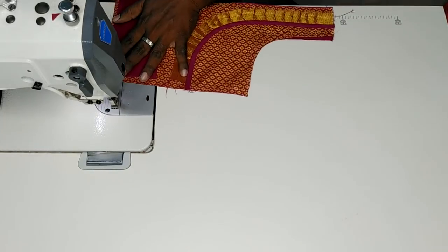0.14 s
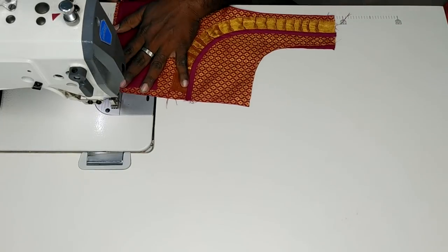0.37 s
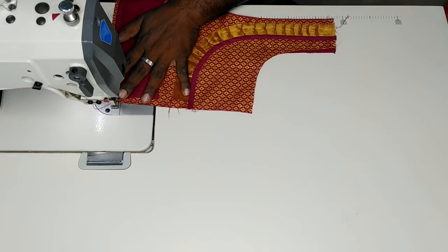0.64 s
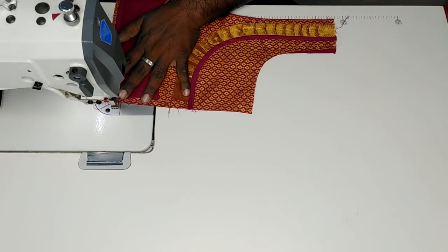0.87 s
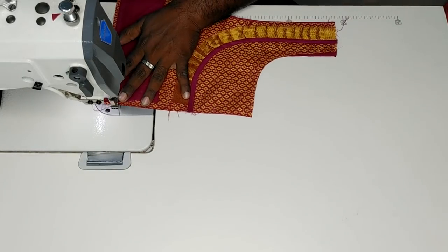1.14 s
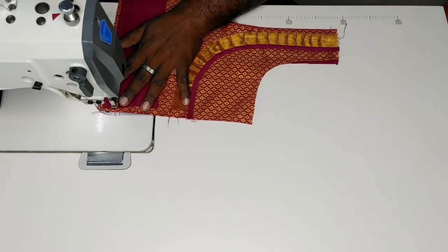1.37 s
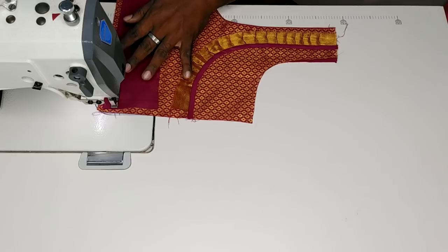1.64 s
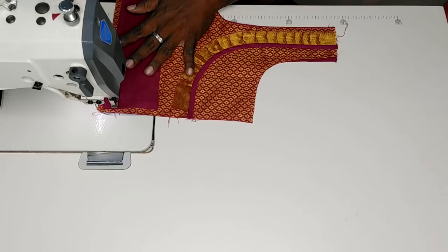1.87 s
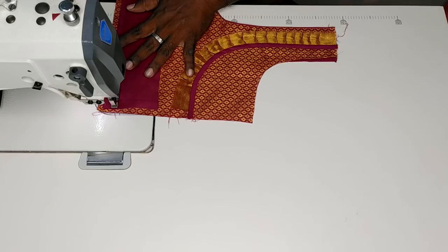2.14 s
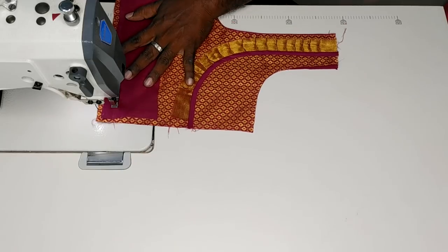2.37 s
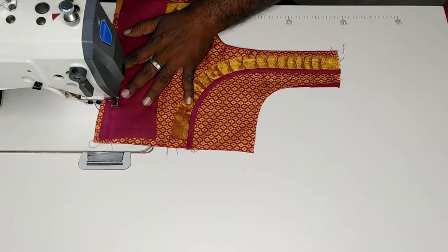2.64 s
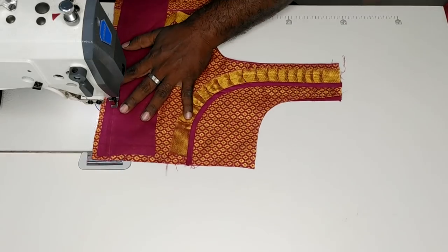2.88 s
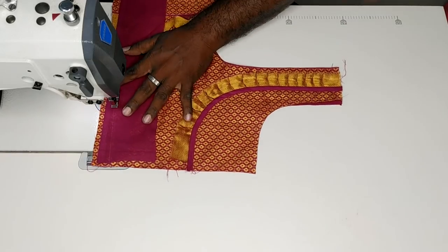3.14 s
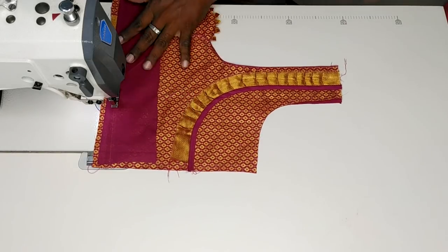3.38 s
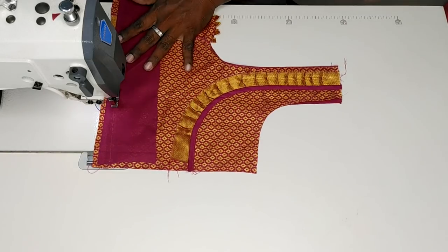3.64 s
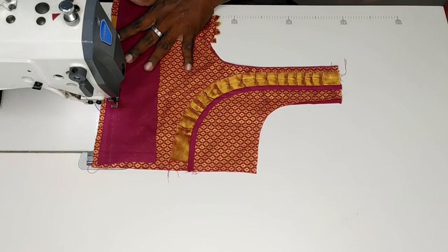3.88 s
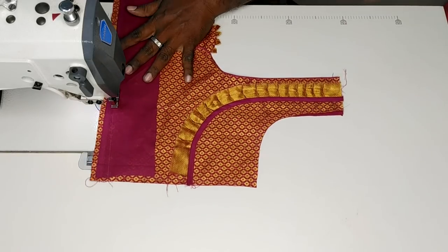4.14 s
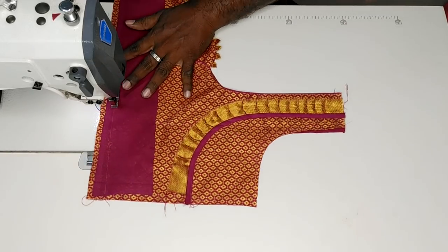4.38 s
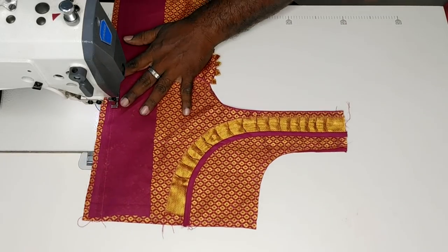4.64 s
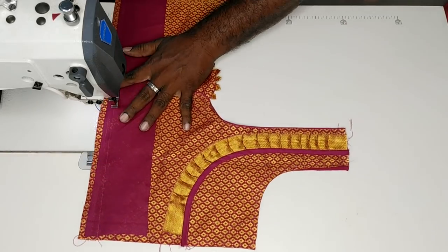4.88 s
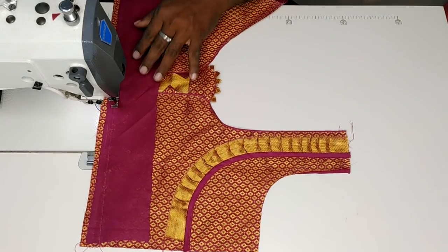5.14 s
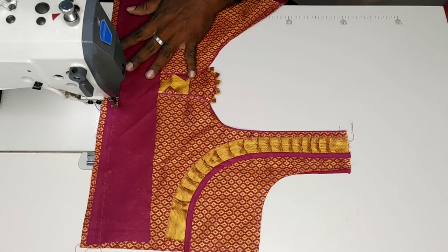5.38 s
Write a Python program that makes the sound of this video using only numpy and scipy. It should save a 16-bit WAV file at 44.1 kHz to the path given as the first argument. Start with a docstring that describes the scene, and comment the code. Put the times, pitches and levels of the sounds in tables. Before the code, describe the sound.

A quiet workshop with a low, distant murmur of machines and fans, heard close above a sewing table in stereo. During the first second there is faint cloth rustling, a soft knock near 0.15 s, and lever clicks around 0.7 to 1.1 s. At 1.1 s the machine starts a short, slower run with distinct ticks, brakes at 1.4 s with a knock and stops by 1.65 s. Soft fabric rubbing follows. At 2.3 s it leaps to full speed: a dense low buzz near 56 stitches a second, whining gears and bright, pulsing metal clatter, slightly faster at first, then steady. A sharp clack at 3.0 s begins a falling rundown, ending at 3.3 s. Cloth slides and scrapes around 3.4 to 3.6 s. A longer fast run begins at 4.0 s, brakes with another clack at 5.0 s and stops near 5.35 s with small ticks, leaving rustle and short room reverberation.

```python
"""Industrial sewing machine, three runs

Workshop, from just above the machine's table, two microphone ports: one slow run, then two fast ones.
The shaft shakes the table on multiples of the stitch rate, gears whine, hook and needle bar clatter as
filtered noise, and the motor housing rings. Cloth rustles in noise strokes, levers click as short ringing
blows and bright ticks, and the shop murmurs quietly as coloured noise."""
import sys
import numpy as np
from scipy import signal
from scipy.fft import rfft, irfft, next_fast_len
from scipy.io import wavfile
from scipy.ndimage import uniform_filter1d

SR = 44100
rng = np.random.default_rng(int(sys.argv[2]) if len(sys.argv) > 2 else 0)


def output_pcm(signal):
    """Save a mono or channel-first signal as 16-bit PCM at the path in sys.argv[1].

    Samples are clipped to [-1, 1] before scaling.
    """
    pcm = np.clip(np.atleast_2d(signal).T, -1, 1) * 32767
    wavfile.write(sys.argv[1], SR, np.round(pcm).astype(np.int16))


def elevation(decibels):
    """Turn decibel levels (scalar or array-like) into linear amplitude ratios."""
    levels = np.asarray(decibels, float)
    return 10 ** (levels / 20)


N = 242991
T = np.arange(N) / SR
SIZE = next_fast_len(N + 4096)  # padded length for filtering
HZ = np.fft.rfftfreq(SIZE, 1 / SR)
BRIEF = SR // 5  # samples in a knock or tick
FULL_SPEED = 56.2  # stitches per s

# Runs of the machine: (pedal down [s], brake [s], standstill [s], settled rate [stitches per s],
# spin-up time [s], softness of the braking [1 = even, more = late])
STITCH_RUNS = [(1.13, 1.41, 1.64, 30.5, .085, 2.2), (2.291, 3.0, 3.331, 56.36, .055, 1.05),
               (4.033, 4.981, 5.35, 56.3, .055, .95)]


def shaft():
    """Stitches per s: the motor overshoots, settles, and the brake runs it down."""
    overshoot, settle_s, settle_edge = .14, .36, 3.7  # extra share of speed, and how it dies away
    speed = 0
    for start, brake, still, rate, rise, soft in STITCH_RUNS:
        t = np.clip(T - start, 0, brake - start)
        spin_up = 1 - np.exp(-t / rise)
        extra = overshoot * np.exp(-(t / settle_s) ** settle_edge)
        braked = np.clip((T - brake) / (still - brake), 0, 1) ** soft
        speed = speed + rate * spin_up * (1 + extra) * (1 - braked)
    return speed


def awake(wake_s):
    """Gain that opens over wake_s after the pedal goes down and dies away after standstill."""
    gain = 0
    for start, _, still, *_ in STITCH_RUNS:
        opening = np.clip((T - start) / wake_s, 0, 1)
        gain = gain + opening * elevation(-190 * np.clip(T - still, 0, None))  # 190 dB per s
    return gain


# Shaft hum of the table at full speed: (multiple of the stitch rate, level [dB])
SHAFT_HUM = [(1, -41), (2, -44), (3, -48), (4, -43.5), (5, -42), (6, -41.5), (7, -49.5), (8, -43), (9, -52),
             (10, -50), (11, -48), (12, -53.5), (13, -53)]
# Meshing gear teeth at full speed, under drive: (multiple of the stitch rate, level [dB])
GEAR_WHINE = [(21, -54), (22, -53), (33, -57), (41, -53.5), (42, -53), (44, -47.5), (66, -50.5)]


def shaking(speed, turns):
    """Unbalanced parts push harder with speed; gears sing under drive; loose play and the hand rumble."""
    share = speed / FULL_SPEED
    unbalance = awake(.11) * share ** 2.4 * lines(turns, force_for(SHAFT_HUM), waver_db=2.05)
    # once the brake bites the teeth are unloaded
    braking = uniform_filter1d(1. * (np.gradient(speed) * SR < -60), size=1500)
    mesh = share ** 1.5 * elevation(-12 * braking) * lines(turns, force_for(GEAR_WHINE), waver_db=1.6)
    loose_colour = [(30, -19), (60, -13), (100, -1), (200, -3), (300, -13), (400, -2.0), (600, -1.5),
                    (800, -9), (1100, -5.5), (2000, -24.5)]
    loose = unit(colour(rng.standard_normal(N), loose_colour))
    rub_colour = [(30, -22), (60, -14.5), (110, 0), (220, -2.0), (300, -18), (400, -8.5), (700, -13),
                  (1500, -31)]
    low = unit(colour(rng.standard_normal(N), rub_colour))
    rub = strokes(axis=2) * elevation(2.5 * walk(14)) * low
    return unbalance + mesh + rumble_gain(speed) * loose + rub


def lines(turns, orders, waver_db):
    """Sines locked to the shaft; level and phase waver, the phase of high multiples most."""
    total = 0
    for k, db in orders:
        level = np.sqrt(2) * elevation(db + waver_db * walk(18))
        phase = 2 * np.pi * (k * turns + rng.random()) + .013 * k * walk(70)
        total = total + level * np.sin(phase)
    return total


def rumble_gain(speed):
    """Louder with speed, more so in the overshoot and when the brake bites."""
    crawl_db, full_db = -60, -42
    db = crawl_db + (full_db - crawl_db) * np.minimum(speed / FULL_SPEED, 1)
    # above 58.6 stitches per s loose parts rattle harder
    rattle = (1 + np.tanh((speed - 58.6) / .6)) / 2
    # the brake jolts them, fading over .22 s
    jolt = sum((T > brake) * np.exp(-np.abs(T - brake) / .22) for _, brake, *_ in STITCH_RUNS)
    return awake(.11) * elevation(db + 5.5 * rattle + 7 * jolt)


# Modes of table and machine bed: (frequency [Hz], t60 [s], gain at the mode [dB])
TABLE_MODES = [(59.63, 1.9, 18), (90.1, 0.24, 9.5), (139.5, 0.52, 2.5), (192.1, 0.16, 9.5),
               (303.2, .18, 15.5), (365.7, 0.24, 5), (402.4, .3, 6.5), (449.3, 0.22, 3), (589.5, .22, 5),
               (655, 0.22, -1.5), (1020, .1, 0.5), (1200, 0.045, 0), (2280, .025, 0), (3962, .025, -0.5)]


def table(force, through_db=-7):
    """The table passes the force on and rings where it meets a mode."""
    modes = sum(elevation(db) * ring(force, hz, t60) for hz, t60, db in TABLE_MODES)
    return elevation(through_db) * force + modes


def force_for(orders):
    """The push that the table turns into these levels at full speed."""
    click = 1. * (T == 0)
    response = np.abs(rfft(table(click), SIZE))
    return [(k, db - 20 * np.log10(np.interp(k * FULL_SPEED, HZ, response))) for k, db in orders]


# Colour of the hook and needle bar noise: (frequency [Hz], relative level [dB per Hz])
CLATTER_COLOUR = [(400, -24), (700, -6.5), (950, -6), (1200, -4), (1500, -4), (2300, -2.5), (2800, -7.5),
                  (3700, -7.5), (4300, -9), (5700, -12), (6800, -12.5), (7700, -6), (8800, -3.5),
                  (9500, -8), (13500, -12.5), (14000, -31)]


def clatter(speed, turns):
    """Metal noise that swells once a stitch and again as the hook passes twice."""
    stitch_db = 1.4 * np.cos(2 * np.pi * turns)
    hook_db = 1.2 * np.cos(4 * np.pi * turns + 1.4)
    swell = elevation(stitch_db + hook_db + 1.03 * walk(60))
    return clatter_gain(speed) * unit(colour(swell * pair(), CLATTER_COLOUR))


def clatter_gain(speed):
    """Louder with speed up to a ceiling, softer under the brake."""
    crawl_db, full_db, ceiling_db, brake_db = -57, -33, -32, -1.5
    db = crawl_db + (full_db - crawl_db) * speed / FULL_SPEED
    braked = sum(np.clip((T - brake - .02) / .05, 0, 1) * (T < still + .3)
                 for _, brake, still, *_ in STITCH_RUNS)
    return awake(.05) * elevation(np.minimum(db, ceiling_db) + brake_db * braked)


def motor(speed, turns, thumps):
    """The housing rings under sweeping torque ripple, rubbing parts and hand, and blows."""
    poles, housing_hz, housing_t60_s = 22, 590, .14  # one ripple per pole and turn
    ripple_level = elevation(-36 + 2.5 * walk(30)) * (speed > 0)
    ripple = ripple_level * np.sin(2 * np.pi * poles * turns + 1.1 * walk(45))
    parts = elevation(-23 + 4 * walk(22)) * awake(.05) * (speed / FULL_SPEED + .03) ** .6
    hand = elevation(24) * strokes(axis=1)
    rubbing = (parts + hand) * rng.standard_normal(N)
    return ring(ripple + rubbing + elevation(5) * thumps, housing_hz, housing_t60_s)


# Parts knocking: (time [s], peak level of the ring [dB], ring pitch [Hz], time to fall 20 dB [s],
# peak of the thump on the table, relative to the ring [dB])
PART_KNOCKS = [(.155, -51, 201, 0.029, -16), (0.716, -58, 300, .03, -2), (0.867, -42, 676, 0.0095, -1),
               (0.901, -42.5, 603, .04, -14), (1.031, -42, 1180, 0.0084, -11),
               (1.072, -38, 1880, 0.0057, -12), (1.416, -30, 1250, .018, 3.5),
               (3.008, -25.5, 1200, 0.017, 0), (4.999, -25.5, 1220, .015, -0.5)]


def knocks():
    """Each blow is a noise burst that rings at its own pitch and thumps the table."""
    rings, thumps = np.zeros((2, N))
    for s, db, hz, length, thump_db in PART_KNOCKS:
        blow = fall(length, rise=.002) * rng.standard_normal(BRIEF)
        broad = ring(ring(blow, hz, 3 / hz), hz, 3 / hz)
        own = ring(broad, hz, 30 / hz) + 0.18 * broad
        thump = ring(ring(blow, 450, .005), 450, .005)
        add(rings, s, elevation(db) * own / np.abs(own).max())
        add(thumps, s, elevation(db + thump_db) * thump / np.abs(thump).max())
    return rings, thumps


# Bright ticks of hook and levers: (time [s], nominal level, before a common 6.5 dB cut [dB])
BRIGHT_TICKS = [(.7607, -56.5), (0.8696, -39), (1.0435, -47), (1.073, -35.5), (1.1623, -36.5),
                (1.1844, -33.5), (1.208, -33.5), (1.26, -31), (1.4441, -33.5), (1.6018, -39.5), (1.92, -60),
                (2.3012, -51), (2.3202, -42), (2.346, -30.5), (3.2061, -34.5), (3.2889, -39), (3.4945, -58),
                (4.045, -41), (4.0637, -38), (5.2809, -42), (5.3028, -41)]
# Colour of a tick: (frequency [Hz], relative level [dB per Hz])
TICK_COLOUR = [(700, -10.5), (2000, -5.5), (4000, -8), (6000, -12.5), (7800, -8), (8700, 1), (9500, -8),
               (13000, -7), (14000, -25.5)]


def ticks():
    """Short bright bursts of noise, falling 20 dB in 17 ms."""
    level = np.zeros(N)
    for s, db in BRIGHT_TICKS:
        add(level, s, elevation(db - 6.5) * fall(.017))
    return level * unit(colour(pair(), TICK_COLOUR))


# Colours of cloth on the table: (frequency [Hz], relative level [dB per Hz])
HISS_COLOUR = [(2500, -20.5), (5000, -10), (9000, 0), (11000, -5), (13500, -13)]
SCRAPE_COLOUR = [(400, -21), (700, -6), (1390, -1), (2050, -4.5), (2290, 4), (2550, -8), (6000, -12),
                 (9000, -26)]


def cloth():
    """A soft hiss and a lower scrape, both flickering."""
    hiss = strokes(axis=0) * elevation(1.5 * walk(25)) * unit(colour(pair(), HISS_COLOUR))
    scrape = strokes(axis=1) * elevation(1.6 * walk(30)) * unit(colour(pair(), SCRAPE_COLOUR))
    return hiss + scrape


# Strokes of hand and cloth on the table: (time [s], time to fade 20 dB [s],
# hiss level [dB], scrape level [dB], rub level [dB])
CLOTH_STROKES = [(0, 1.9, -68, -78, -59), (.155, 0.02, -78, -83, -56), (.485, .3, -78, -60, -70),
                 (.72, .5, -83, -82, -59), (.87, 0.26, -58, -55.5, -53.5), (1.085, .15, -59.5, -60, -63.5),
                 (1.72, .4, -81, -72, -62.5), (1.92, 0.4, -76, -69, -69), (2.2, 0.7, -77, -72, -65),
                 (3.42, 0.13, -78, -67, -56), (3.495, .2, -70.5, -60, -59.5), (3.98, 0.5, -77.5, -72, -70),
                 (5.3, .5, -84, -69, -53), (5.49, 1, -76, -61, -57)]


def strokes(axis):
    """Gain of hiss (0), scrape (1) or rub (2): each stroke swells quickly and fades."""
    rest_db = (-91.5, -86, -76)[axis]  # while the hand lies still
    power = np.full(N, elevation(rest_db) ** 2)
    for s, fade, *db in CLOTH_STROKES:
        t = T[:int(2 * fade * SR)]
        swell = 1 - np.exp(-t / .011)
        add(power, s, (elevation(db[axis] - 20 * t / fade) * swell) ** 2)
    return np.sqrt(power)


# Colour of the shop: (frequency [Hz], relative level [dB per Hz])
SHOP_COLOUR = [(25, -10), (60, -4), (110, -2.5), (200, -6.5), (400, -11), (600, -15), (1020, -18.5),
               (1500, -22), (2300, -29), (5000, -38), (14000, -49)]


def shop():
    """Distant machines and fans, flickering slowly."""
    return elevation(-61.5 + 1.2 * walk(8)) * unit(colour(pair(), SHOP_COLOUR))


def room(x):
    """Fading reflections, duller than the source, unrelated in mid and side."""
    t60_s, level_db = 0.57, -7.5
    t = T[:SR]
    tail = rng.standard_normal((2, SR)) * np.exp(-np.log(1000) * t / t60_s)
    tail = tail * (t > .006)  # no reflection in the first 6 ms
    tail = tail / np.sqrt(np.sum(tail ** 2, axis=1, keepdims=True))
    wet = signal.fftconvolve(x[None], tail, axes=1)[:, :N]
    return elevation(level_db) * colour(wet, [(100, -3.5), (1000, 1), (5000, -3), (14000, -13)])


def unit(x):
    """Scale to rms 1."""
    return x / np.sqrt(np.mean(x ** 2))


def over_hz(points):
    """(Hz, dB) points joined on a log axis."""
    hz, db = np.transpose(points)
    return np.interp(np.log(HZ + 1), np.log(hz + 1), db)


def colour(x, points):
    """Filter by a curve of (Hz, dB) points."""
    return irfft(rfft(x, SIZE) * elevation(over_hz(points)), SIZE)[..., :N]


def ring(x, hz, t60):
    """One resonance, gain about 1 at its centre."""
    r = np.exp(-np.log(1000) / (t60 * SR))
    return signal.lfilter([1 - r, 0, r - 1], [1, -2 * r * np.cos(2 * np.pi * hz / SR), r * r], x)


def walk(rate):
    """Random levels held 1 / rate s and smoothed; spread 1."""
    k = int(SR / rate)
    held = rng.standard_normal(size=1000)[np.arange(N) // k]
    return unit(uniform_filter1d(uniform_filter1d(held, k), k))


def pair():
    """Two unrelated noises, for mid and side."""
    return rng.standard_normal((2, N))


def add(out, s, sound):
    """Mix a short sound in at time s."""
    k = int(s * SR)
    out[k:k + len(sound)] += sound[:N - k]


def fall(length, rise=.0004):
    """Quick start, then 20 dB down in each length."""
    t = T[:BRIEF]
    return (1 - np.exp(-t / rise)) * np.exp(-np.log(10) * t / length)


# Width of the airborne sound: (frequency [Hz], gain of the side signal [dB])
SIDE_GAIN = [(60, -21.5), (110, -20.5), (200, -21), (370, -22), (670, -18), (1230, -11), (2260, -4),
             (4140, -1), (7570, -1.5), (13900, 1.5)]


def scene():
    """Left and right: what comes through the table is nearly centred, airborne noise is wide."""
    speed = shaft()
    turns = np.cumsum(speed) / SR
    rings, thumps = knocks()
    solid = table(shaking(speed, turns) + thumps) + rings + motor(speed, turns, thumps)
    metal = clatter(speed, turns) + ticks()
    mid, side = metal + room(solid + metal[0]) + cloth() + shop()
    # the far end of the table answers 6.7 ms late, with opposite sign left and right
    far_end = elevation(-25.5) * np.roll(solid, int(0.0067 * SR))
    side = colour(side, SIDE_GAIN) + far_end
    return np.array([mid + solid + side, mid + solid - side])


def top_cut(x):
    """Nothing passes above the cut-off."""
    return signal.sosfilt(signal.butter(12, 14460, fs=SR, output="sos"), x)


# Balance of the microphone ports: (frequency [Hz], left minus right [dB])
PORT_BALANCE = [(60, -0.5), (110, -0.5), (200, 0.0), (370, -0.5), (670, -0.5), (1230, -1.5), (2260, -4.5),
                (4140, -1.0), (7570, 1.0), (13900, -2)]


def record(dry):
    """Two microphone ports: the left is a little nearer and has its own colour; the top is cut."""
    left_lead_s = 4.5e-5
    # half of the balance and lead goes to each port, in opposite senses
    tilt = elevation(over_hz(PORT_BALANCE) / 2) * np.exp(1j * np.pi * HZ * left_lead_s)
    below_top = HZ < 13900
    ports = irfft(rfft(dry, SIZE) * below_top * np.array([tilt, 1 / tilt]), SIZE)[:, :N]
    return top_cut(ports)


dry = scene()
out = record(dry)
output_pcm(out)
```